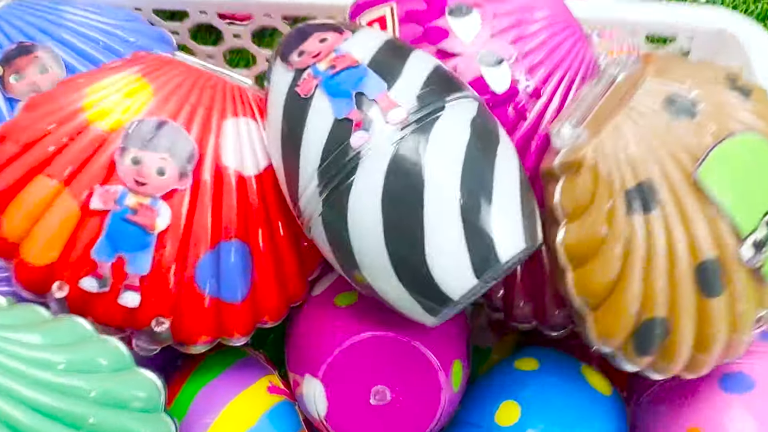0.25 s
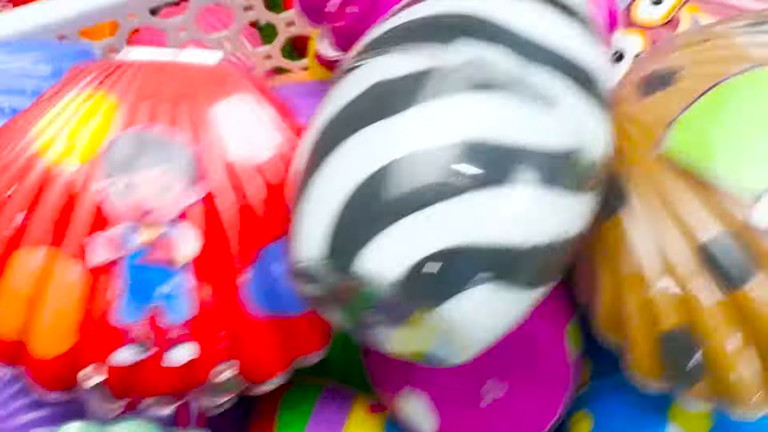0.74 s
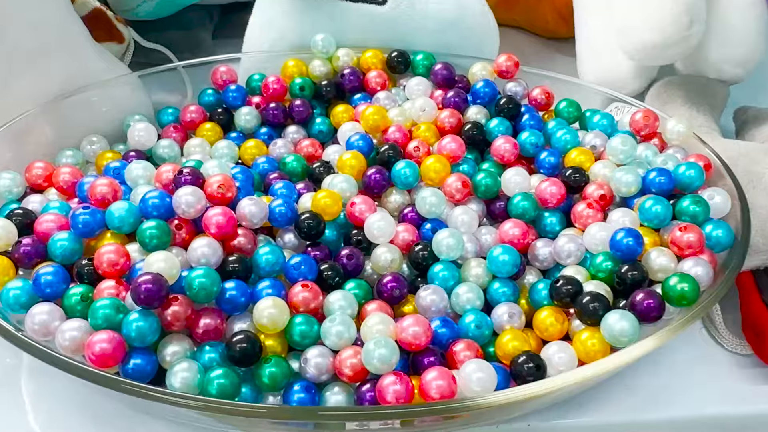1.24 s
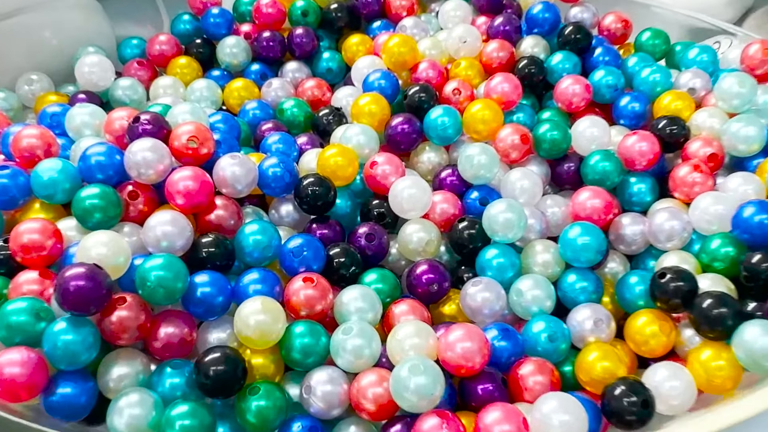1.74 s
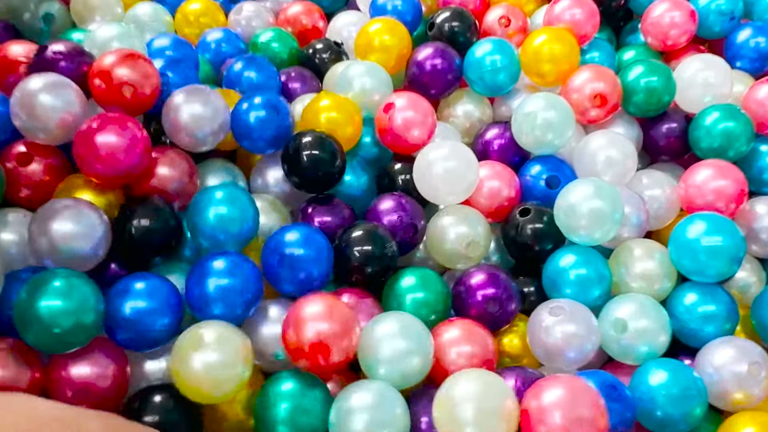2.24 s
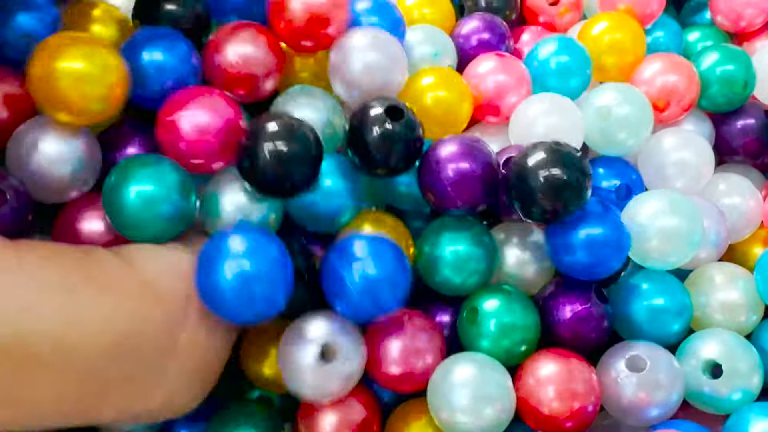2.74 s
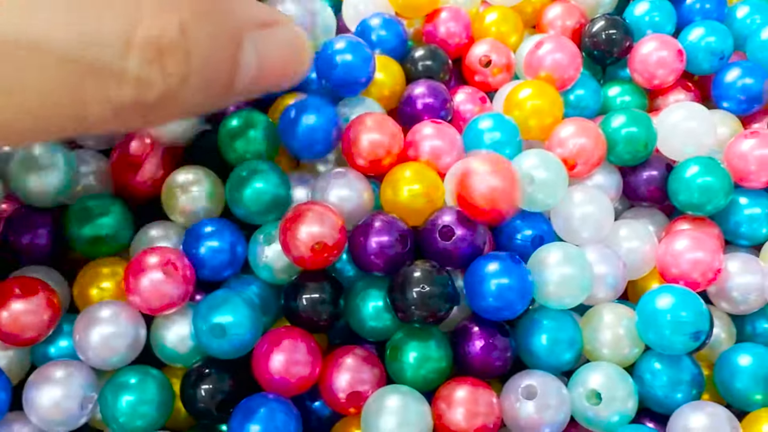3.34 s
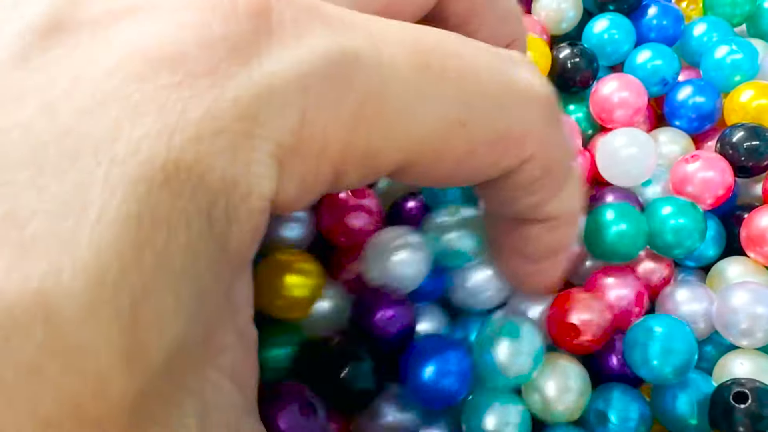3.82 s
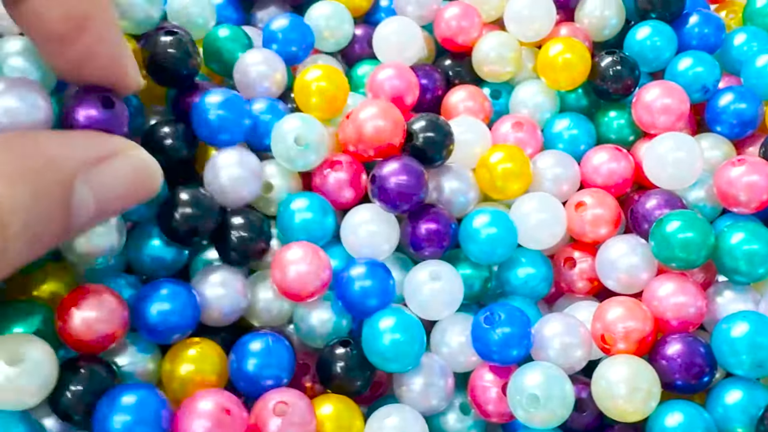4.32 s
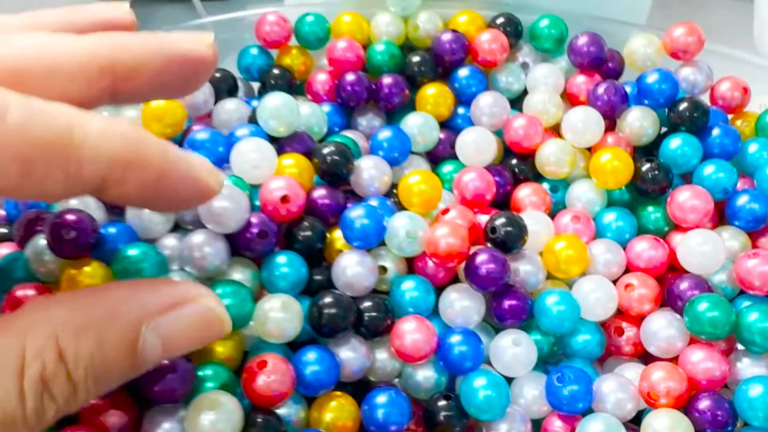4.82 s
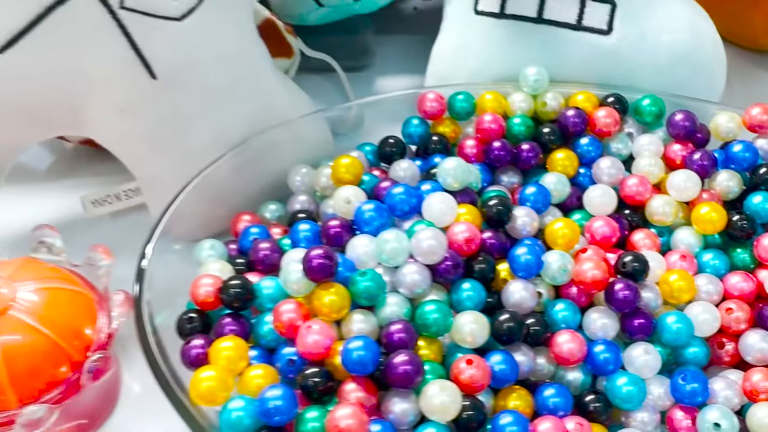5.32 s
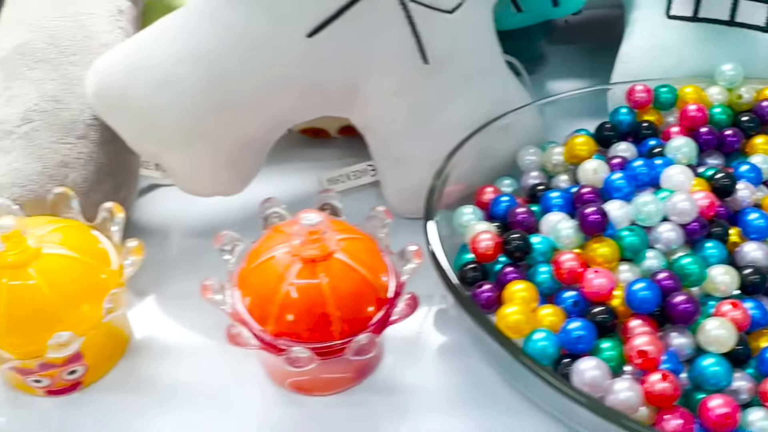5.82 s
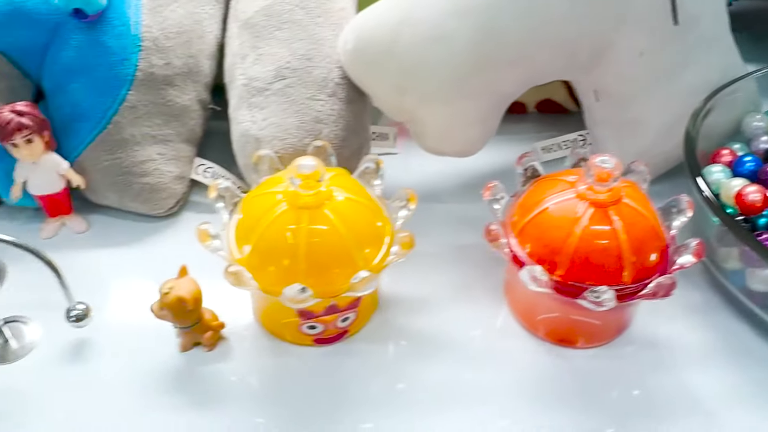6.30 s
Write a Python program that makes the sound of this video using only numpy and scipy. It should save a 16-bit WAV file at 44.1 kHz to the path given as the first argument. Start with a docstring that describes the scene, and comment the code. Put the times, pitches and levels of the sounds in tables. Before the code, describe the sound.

Close, dry stereo microphone in a very quiet room. At 0 s there is a faint hiss and a tiny rock of a hollow shell; from about 0.13 s hard plastic toys tumble together, hollow boxy knocks with sharp edge ticks, growing dense and loud from 0.5 s, loudest around 0.8 s. At 1.27 s the clatter is cut dead, leaving one faint shell rocking until about 1.36 s. Near silence until 2.0 s. Then a hand stirs hard beads in a glass bowl: soft low bumps at the start, then a dense, bright, hissing rattle of short clacks with slight glassy ring, its low end opening and closing. It continues to about 4.4 s, thins into separate clacks, one strong at 4.58 s, the last clear ones near 4.9 s. A soft swish at 5.0 s, faint hiss around 5.6 s, dull low handling bumps and very quiet air last until about 6.5 s.

```python
"""Close to a stereo microphone, hollow plastic toys tumble together and are cut off; one shell rocks faintly.
After a near silence a hand stirs hard beads in a glass bowl: dense clacks, thinning to single hits.
Hits are clicks and noise cracks; knocks and clacks also strike decaying modes of shell or glass.
The low end of the bead rattle opens and closes.
Soft low bumps of handling, shaped hiss and very quiet air lie underneath."""
import sys
import numpy as np
from scipy import signal
from scipy.fft import rfft, irfft, next_fast_len
from scipy.io import wavfile
from scipy.ndimage import uniform_filter1d, minimum_filter1d

SR = 44100
rng = np.random.default_rng(int(sys.argv[2]) if len(sys.argv) > 2 else 0)


def voltage_ratio(level):
    """Linear amplitude factor for a level in decibels (scalar or array-like)."""
    return 10 ** (np.asarray(level, float) / 20)


def transcribe(signal):
    """Save signal, clipped to [-1, 1], as a 16-bit WAV file at the path in sys.argv[1]."""
    frames = np.atleast_2d(signal).T
    limited = np.clip(frames, -1, 1)
    pcm = np.round(limited * 32767).astype(np.int16)
    wavfile.write(sys.argv[1], SR, pcm)


N = 289296
TIME = np.arange(N) / SR


def on_log(table, hz):
    """Read a (f/Hz, value) table on a log-frequency axis."""
    f_hz, value = np.array(table).T
    return np.interp(np.log(hz), np.log(f_hz), value)


def band(x, lo_hz, hi_hz, order=3):
    """Butterworth band-pass."""
    sos = signal.butter(order, [lo_hz, min(hi_hz, .45 * SR)], "band", fs=SR, output="sos")
    return signal.sosfilt(sos, x)


# likeness of the two microphone ports: f/Hz, correlation [0-1]
PORT_LIKENESS = [(100, .97), (300, .88), (700, .76), (1400, .48), (2200, .66), (5000, .42), (7100, .65),
                 (9100, .96), (12000, .97), (15500, .75)]


def pair(a, b, hz):
    """Left and right from two unrelated draws, as alike as the ports are at this frequency."""
    alike = on_log(PORT_LIKENESS, hz)
    return np.array([a, alike * a + np.sqrt(1 - alike ** 2) * b])


def pole(t60_s):
    """Gain per sample of a 60 dB fall in t60_s."""
    return np.exp(-np.log(1000) / (t60_s * SR))


def noise(lo_hz, hi_hz):
    """Stereo band noise of rms 1."""
    x = band(pair(*rng.standard_normal((2, N)), lo_hz), lo_hz, hi_hz, order=4)
    return x / x.std()


def bell(t_s, mid_s, length_s):
    """Gaussian swell, length_s wide between its 1/e points."""
    return np.exp(-(2 * (t_s - mid_s) / length_s) ** 2)


# air spectrum, relative: f/Hz, density/dB per Hz
AIR_SPECTRUM = [(18, -26.5), (30, -13.5), (56, -7), (415, -21), (1630, -25), (2830, -41.5), (6500, -39),
                (8000, -51), (16000, -65.5)]


def room():
    """Very quiet air: shaped stereo noise."""
    size = next_fast_len(N)
    hz = np.arange(1, size // 2 + 2) * SR / size
    spectra = pair(*rfft(rng.standard_normal((2, size))), hz)
    air = irfft(spectra * voltage_ratio(on_log(AIR_SPECTRUM, hz)), size)[:, :N]
    return voltage_ratio(-73.5) * air / air.std()


# faint swishes: peak t/s, level/dB, rise/s, fall/s (20 dB each), treble re level/dB
SWISHES = [(0, -39.5, .01, 0.6, -5.5), (.14, -28, 0.034, 0.059, -9), (1.316, -36.5, .012, 0.056, -47),
           (5.02, -33.5, 0.067, 0.15, -25), (5.62, -48, 0.22, 0.13, -13)]


def hiss():
    """Noise bands: broad swishes that swell and fade, and a thin hiss that stays a while."""
    low = high = 0
    for s, db, rise_s, fall_s, treble_db in SWISHES:
        swell = voltage_ratio(db - 20 * np.maximum((s - TIME) / rise_s, (TIME - s) / fall_s))
        low = low + swell
        high = high + swell * voltage_ratio(treble_db)
    thin_start_s, thin_end_s = 5.42, 5.76
    outside = np.maximum((thin_start_s - TIME) / .55, (TIME - thin_end_s) / .037)  # s per 20 dB
    thin = voltage_ratio(-20 * np.maximum(0, outside))
    return (thin * voltage_ratio(-54) * noise(3000, 3850) + low * noise(2350, 7000)
            + (high + thin * voltage_ratio(-55)) * noise(7900, 11500))


# soft bumps of the grip on the microphone: peak t/s, level/dB, f/Hz, length/s
GRIP_BUMPS = [(0.394, -51, 70.5, .1), (0.614, -33, 70, 0.058), (0.881, -42.5, 75, 0.06),
              (1.106, -55.5, 60, 0.068), (2.09, -26, 67.8, 0.033), (2.118, -18.5, 121, 0.016),
              (2.139, -25.5, 70.8, 0.022), (2.166, -40, 243, 0.02), (2.168, -30, 85, 0.046),
              (2.205, -24, 128.6, 0.026), (2.233, -33.5, 85, 0.058), (2.289, -33, 70.8, 0.035),
              (2.34, -30.5, 130, 0.022), (2.389, -45.5, 84, 0.048), (2.498, -43, 310, 0.038),
              (2.593, -50.5, 401, 0.14), (2.522, -34, 90.6, 0.033), (2.592, -35, 63.2, 0.05),
              (2.722, -51.5, 75.8, 0.045), (3.417, -59.5, 132, .06), (3.724, -41, 58, 0.057),
              (3.74, -58, 238, 0.055), (4.263, -59.5, 55.4, 0.06), (4.744, -42.5, 45, 0.1),
              (4.766, -40, 98.5, 0.07), (4.823, -59.5, 230, 0.067), (4.897, -57.5, 94.8, 0.043),
              (5.144, -35, 103.3, 0.074), (5.187, -58, 54.6, 0.05), (5.212, -36.5, 97.7, 0.033),
              (5.341, -43.5, 97.2, 0.047), (5.352, -51, 50.3, 0.22), (5.406, -61.5, 240, 0.051),
              (5.477, -47.5, 59.7, 0.12), (5.48, -41, 94.6, 0.074), (5.626, -33.5, 98.5, 0.1),
              (5.628, -46, 51.4, 0.088), (5.732, -43.5, 95.4, 0.075), (5.732, -46.5, 52.1, 0.16),
              (5.906, -37.5, 50.05, 0.097), (5.917, -46, 99.8, 0.074), (6.036, -54.5, 98.3, 0.11),
              (6.15, -48, 99.3, 0.13), (6.157, -47.5, 50, .07), (6.248, -50, 48.1, 0.081),
              (6.37, -57, 55.5, 0.054), (6.498, -59, 48.1, 0.11)]


def handling():
    """Each bump is a few soft sine cycles with a little low rubbing noise."""
    tone, rub = np.zeros(N), np.zeros(N)
    for (s, db, hz, length_s), turn in zip(GRIP_BUMPS, rng.random((len(GRIP_BUMPS), 1))):
        at = slice(max(int((s - 2 * length_s) * SR), 0), int((s + 2 * length_s) * SR))
        swell = voltage_ratio(db) * bell(TIME[at], s, length_s)
        tone[at] += swell * np.sin(2 * np.pi * (hz * TIME[at] + turn))
        rub[at] += swell
    return tone + voltage_ratio(-12) * rub * noise(36, 115)


# small rocks of one shell: onset t/s, level/dB, f/Hz
SHELL_ROCKS = [(.008, -38.5, 935), (1.311, -29, 1078), (1.333, -35.5, 1050), (1.359, -51, 1006)]


def rock():
    """One shell rocks lightly: short sine hums near 1 kHz, peaking 6.2 ms after onset."""
    hum = np.zeros(N)
    for s, db, hz in SHELL_ROCKS:
        t = np.clip(TIME - s, 0, None) / 0.0062
        hum += voltage_ratio(db) * (t * np.exp(1 - t)) ** 2 * np.sin(2 * np.pi * hz * TIME)
    return hum


def swarm(table, count, spread_db, each_db, pan_db):
    """Random small hits under a level curve, a few much stronger than the rest."""
    t_s, curve_db = np.array(table).T
    when, size, side = rng.random((count, 3)).T
    when = t_s[0] + (t_s[-1] - t_s[0]) * when
    level_db = np.interp(when, t_s, curve_db) + each_db - spread_db * np.log(np.maximum(size, .04))
    return when, level_db, pan_db + 8 * (side - .5)


def clatter(s, peak_db, pan_db, colour_db, crack, modes, crack_t60, rise_t60, scatter_db, click_db, drift_db,
            ring_db, tail_db, tail_t60, spread=0, loose=1):
    """Every hit is a click and a short crack of its own colour with a room tail, and strikes any modes anew."""
    start = int(s.min() * SR)
    at = (s * SR).astype(int) - start
    size = min(at.max() + SR // 3, N - start)
    side_db = peak_db + np.array([pan_db, -pan_db]) / 2
    rise = pole(rise_t60)

    def drift():
        """The heap shifts, so each band swells and sinks a few times a second."""
        knots_s = np.arange(s.min(), s.max() + 1, .2)
        return drift_db * np.interp(s, knots_s, rng.standard_normal(len(knots_s)))

    # each click reaches the two ports a few samples apart
    lag, sign = rng.random((len(s), 2)).T
    arrive = [at + 12, at + (24 * lag).astype(int)]

    # cracks in third-octave bands
    centres = 16290 / 2 ** np.arange(0, np.log2(16290 / crack[1][0]) + .1, 1 / 3)
    centres = centres[centres < 1.2 * crack[-2][0]]
    power = voltage_ratio(on_log(crack, centres)) ** 2 * centres
    edge = 2 ** (1 / 6)
    white, out = rng.standard_normal((2, size)), np.zeros((2, size))
    for hz, share in zip(centres, power / power.sum()):
        gain = voltage_ratio(side_db + colour_db(hz) + drift() + scatter_db * rng.standard_normal(len(s)))
        push = signal.lfilter([1 - rise], [1, -rise], [np.bincount(at, g ** 2, size) for g in gain])
        # lower cracks last longer; crack_t60 holds at 3 kHz
        fall = pole(crack_t60 * (3000 / hz) ** 0.065)
        envelope = signal.lfilter([1], [1, -fall ** 2], push)
        envelope += voltage_ratio(tail_db) ** 2 * signal.lfilter([1], [1, -pole(tail_t60) ** 2], push)
        clicks = np.array([np.bincount(a, g * np.sign(sign - .5), size) for a, g in zip(arrive, gain)])
        burst = np.sqrt(envelope) * pair(*white, hz) + voltage_ratio(click_db) * clicks
        width = hz * (edge - 1 / edge) / (SR / 2)
        out += np.sqrt(share / width) * band(burst, hz / edge, hz * edge, order=4)

    # every mode comes in three slightly different tunings, and each hit finds one of them
    ring = np.zeros((2, size))
    pick = np.round(np.clip(.8 * loose * rng.standard_normal(len(s)), -1, 1))
    tuned = [(hz * (1 + spread * k), db, t60, k) for hz, db, t60 in modes for k in (-1, 0, 1)]
    for hz, db, t60, k in tuned:
        a, b, c, d = rng.standard_normal((len(s), 4)).T
        phasor = pair(a + 1j * b, c + 1j * d, hz) / np.hypot(a, b) ** .5
        gain = voltage_ratio(side_db + colour_db(hz) + 2 * drift() + db + ring_db) * phasor * (pick == k)
        blows = [np.bincount(at, g.real, size) + 1j * np.bincount(at, g.imag, size) for g in gain]
        # the contact lasts a moment, so the ring swells before it dies
        turn = np.exp(2j * np.pi * hz / SR)
        ring += signal.lfilter([1 - rise], np.poly([rise * turn, pole(t60) * turn]), blows).imag
    if len(modes):
        # nothing radiates below the lowest mode
        out += band(ring, .7 * modes[0][0], 16000, order=4)
    return np.pad(out, ((0, 0), (start, N - start - size)))


# loudest hollow knocks: t/s, level/dB, boom under 600 Hz/dB, left minus right/dB
LOUD_KNOCKS = [(0.131, -22, -15.5, 0.5), (0.141, -16, -14, 9), (0.204, -14.5, 1, -1.5),
               (0.211, -11, -8.5, 10.5), (0.227, -6, 0, -7), (0.279, -10.5, -1.5, 4.5),
               (0.318, -6, 2, -1.5), (0.342, -9, -2, -2.5), (0.356, -5, -1.5, 2), (0.372, -11, 3, -2),
               (0.405, -6, 3.5, -5.5), (0.428, -7, 0, -0.5), (0.4491, -8, -2.5, -2.5),
               (0.502, -11.5, -3, 8.5), (0.5068, -4.5, -5, -4), (0.545, -8, -2, 5),
               (0.563, -8.5, -2.5, -0.5), (0.5733, -4, -4.5, 0.5), (0.602, -4, -6, 6), (0.6097, -9, -6, -6),
               (0.638, -11.5, -6, -4.5), (0.65, -3.5, 5, 3), (0.664, -8.5, 6, 0.5), (0.688, -5, -2.5, 7.5),
               (0.709, -6, -6.5, 18.5), (0.7204, -3, -3.5, 0.5), (0.729, -5.5, -5, 4.5),
               (0.743, -3, 0, 1.5), (0.77, -10.5, -4.5, 2), (0.778, -6.5, 0.5, 7), (0.8018, -12, -3.5, 2),
               (0.825, 0.5, -3, 2.5), (0.836, -4, 1.5, 2.5), (0.849, -6, 7.5, 2), (0.869, -9.5, -2, 4),
               (0.926, -7, -13, 5.5), (0.954, -4, 3.5, 5.5), (0.978, -11, -2, 4.5),
               (1.002, -11.5, -1.5, 2.5), (1.0236, -7.5, 0.5, 4.5), (1.036, -9, -8, -6.5),
               (1.05, -5.5, 0, -1), (1.094, -3.5, 0, 4.5), (1.1268, -4.5, 0, 5.5), (1.14, -1, -3, -5),
               (1.164, -7, -5, 3.5), (1.2123, -8, -2.5, 2.5), (1.256, -11, 0.5, 0)]
# loudest ticks of hard edges: t/s, level/dB, left minus right/dB
LOUD_TICKS = [(0.1431, -14.0, 1.5), (0.2029, -15.0, 3.0), (0.2293, -9.5, 2.0), (0.2886, -20.0, 2.5),
              (0.3007, -15.5, -0.5), (0.3186, -18.0, 1.0), (0.3461, -12.0, 0.0), (0.3754, -9.0, 1.0),
              (0.3868, -11.5, 1.5), (0.4056, -16.5, -0.5), (0.4496, -7.5, 1.5), (0.4999, -14.5, 5.0),
              (0.5076, -13.5, -0.5), (0.5445, -11.0, 0.0), (0.5622, -9.5, 2.5), (0.5726, -12.0, 2.5),
              (0.6088, -13.0, 0.5), (0.6312, -7.0, 1.5), (0.6393, -12.5, 1.0), (0.6498, -10.5, -0.5),
              (0.6885, -18.5, 3.0), (0.7295, -10.0, 0.5), (0.7442, -16.5, 2.0), (0.7637, -19.5, 1.0),
              (0.8021, -11.0, 0.5), (0.8289, -18.0, -1.5), (0.8361, -18.0, 2.0), (0.8415, -15.5, 1.5),
              (0.8486, -17.0, 3.0), (0.8575, -14.5, 3.5), (0.8693, -18.5, 1.5), (0.878, -16.0, -1.5),
              (0.912, -19.5, 3.0), (0.928, -15.0, 4.0), (0.9485, -16.5, 0.5), (0.9695, -13.5, 1.5),
              (0.9741, -12.0, 3.5), (0.9875, -10.0, 1.5), (1.0045, -11.5, 3.5), (1.0219, -12.0, 0.5),
              (1.037, -9.5, 5.0), (1.0784, -10.5, 2.0), (1.0926, -14.5, 4.5), (1.1213, -18.0, 3.5),
              (1.1247, -14.5, 4.0), (1.1378, -16.5, 1.0), (1.1581, -17.5, 0.0), (1.1645, -16.0, 1.5),
              (1.1749, -16.5, 1.5), (1.1841, -16.0, -1.0), (1.2135, -12.0, 2.5), (1.2561, -8.5, 3.5)]
# vigour of the tumble: t/s, level/dB
TUMBLE_VIGOUR = [(0, -46), (.07, -61.5), (.12, -28.5), (.19, -28.5), (.26, -35.5), (.4, -24.5), (.53, -19),
                 (.67, -17.5), (.86, -19), (1.05, -17.5), (1.12, -22), (1.2, -17.5), (1.27, -30.5)]
# crack spectra, relative: f/Hz, density/dB per Hz
KNOCK_SPECTRUM = [(35, -55), (60, -37), (135, -26), (221, 1.5), (305, -9), (948, 1), (1260, -4), (1640, -3),
                  (5500, -22), (7150, -48), (12100, -120)]
TICK_SPECTRUM = [(1800, -23.5), (2600, 1), (3500, -6), (5700, -4), (7100, 0.5), (9000, 1.5), (11300, -1.5),
                 (14200, -19), (16300, -12)]
# hollow shell modes: f/Hz, level/dB, t60/s
SHELL_MODES = [(227.2, -0.5, 0.088), (372, -7, 0.078), (536, 2.5, 0.029), (650, -4, 0.013),
               (820, -13, 0.035), (954, 4.5, 0.045), (1060, 2, 0.025), (1335, -11.5, 0.013),
               (1610, -12.5, 0.033), (1880, -13.5, .02), (2040, -9, 0.031), (2508, -3, 0.04)]


def toys():
    """Hollow knocks that ring the shells and bright ticks of hard edges. The sound is cut off abruptly."""
    s, db, boom_db, pan_db = np.transpose(LOUD_KNOCKS)
    small = swarm(TUMBLE_VIGOUR, count=1100, spread_db=3, each_db=-6.5, pan_db=-2.5)
    # small knocks lose their boom where the vigour is under -30.5 dB
    vigour_db = np.interp(small[0], *np.transpose(TUMBLE_VIGOUR))
    boom_db = np.r_[boom_db, -2.5 + 2 * np.minimum(vigour_db + 30.5, 0)]
    # shells differ in size: mode pitch spread 4.5 %
    knocks = clatter(*np.c_[[s, db, pan_db], small], lambda hz: boom_db * (hz < 600),
                     KNOCK_SPECTRUM, SHELL_MODES, crack_t60=.012, rise_t60=.0018, scatter_db=1.5,
                     drift_db=1, spread=.045, click_db=15, ring_db=-11.5, tail_db=-14, tail_t60=.2)
    small = swarm(TUMBLE_VIGOUR, count=1300, spread_db=5, each_db=-17, pan_db=2.5)
    ticks = clatter(*np.c_[np.transpose(LOUD_TICKS), small], lambda hz: 0, TICK_SPECTRUM, [],
                    crack_t60=.006, rise_t60=.001, scatter_db=3, click_db=3, drift_db=1.5,
                    ring_db=0, tail_db=-28, tail_t60=.3)
    cut_s = 1.273
    cut_db = np.interp(TIME, [cut_s, cut_s + .00091, 1.296, 1.3], [-0.5, -55.5, -85, -53])
    return (knocks + ticks) * voltage_ratio(cut_db)


# stirring vigour: t/s, level/dB
STIR_VIGOUR = [(2.05, -27), (2.13, -29.5), (2.2, -15), (2.35, -21.5), (2.42, -24.5), (2.6, -15.5),
               (2.75, -23), (3.2, -25), (3.42, -24.5), (3.49, -30), (3.62, -28), (3.87, -18), (4.02, -22),
               (4.25, -17.5), (4.43, -25.5), (4.5, -31.5), (4.72, -33), (4.8, -43.5), (4.92, -29.5),
               (5.1, -59)]
BUSY_DB = -26  # stirring level under which the heap calms


def slide(s, db, *colour, count):
    """A loud clack in a moving heap drags neighbours along: weaker repeats scattered nearby."""
    when, size = rng.standard_normal((len(s), 2, count)).transpose(1, 0, 2)
    calm_db = 4 * np.minimum(np.interp(s, *np.transpose(STIR_VIGOUR)) - BUSY_DB, 0)
    near_s = s[:, None] + .004 + .009 * when  # mean delay, spread
    near_db = (db - 13 + calm_db)[:, None] + 2.1 * size
    repeated = [np.r_[c, np.repeat(c, count)] for c in colour]
    return [np.r_[s, near_s.ravel()], np.r_[db, near_db.ravel()]] + repeated


# loudest bead clacks: t/s, level/dB, treble/dB (full from 8 kHz), left minus right/dB
LOUD_CLACKS = [(2.023, -41.5, 11.0, 1.0), (2.0297, -11.0, -3.5, 6.0), (2.0491, -7.5, 5.0, 4.5),
               (2.0652, -19.0, -3.0, 6.0), (2.0759, -25.0, -6.0, 2.5), (2.1014, -6.5, 5.0, 5.0),
               (2.139, -11.0, 1.5, 3.0), (2.1518, -9.0, 6.0, 2.0), (2.1635, -9.0, 6.5, 3.0),
               (2.1817, -5.5, 2.0, 2.5), (2.21, -8.0, 1.5, 4.5), (2.215, -4.0, -5.5, 2.0),
               (2.2192, -6.0, -1.5, 2.5), (2.238, -9.5, -1.0, 2.5), (2.2666, -9.0, 7.5, 1.5),
               (2.2749, -5.5, -1.0, 0.5), (2.2921, -6.5, -4.5, -2.0), (2.3042, -7.0, 4.0, 2.0),
               (2.3433, -11.0, 10.5, 3.0), (2.3489, -7.5, 4.0, 1.0), (2.3678, -9.5, 7.5, 3.5),
               (2.4073, -13.0, 9.0, 2.5), (2.4265, -10.0, -0.5, 3.0), (2.4356, -12.0, 1.5, 1.5),
               (2.4482, -11.5, -0.5, 5.5), (2.4598, -10.5, 7.0, 0.0), (2.4994, -10.0, 8.5, 3.5),
               (2.5122, -8.5, 6.0, 1.5), (2.5405, -8.5, 7.5, 1.0), (2.5472, -5.0, 2.5, 1.0),
               (2.587, -12.0, -2.0, -1.0), (2.618, -6.5, 7.0, 1.0), (2.6285, -8.5, 9.5, 3.5),
               (2.6644, -9.0, 6.0, 5.5), (2.6789, -10.0, 13.0, 5.0), (2.686, -8.0, 9.5, 4.0),
               (2.7239, -7.5, 9.5, 3.5), (2.7451, -13.5, 5.0, 3.0), (2.7651, -10.5, 5.5, 1.0),
               (2.7821, -8.0, 4.5, 2.0), (2.7935, -9.0, 1.5, 2.5), (2.8128, -9.5, 7.5, 2.0),
               (2.8309, -6.5, 2.5, 4.5), (2.8417, -8.5, 4.0, 2.0), (2.8586, -8.0, 6.0, 3.5),
               (2.8659, -10.5, 10.0, 3.5), (2.882, -8.0, 6.5, 3.5), (2.8899, -8.0, 2.0, 5.0),
               (2.8941, -9.5, -1.0, 2.5), (2.9267, -8.0, 6.5, 1.0), (2.9419, -9.5, 14.0, 2.0),
               (2.9554, -10.5, 7.0, 3.0), (2.9701, -9.0, -0.5, 2.0), (2.976, -12.5, 10.0, 2.5),
               (2.9925, -8.5, -2.5, 1.0), (2.9986, -12.0, 8.0, 2.0), (3.0071, -7.0, -0.5, 3.0),
               (3.0288, -7.5, 5.0, 1.5), (3.0367, -10.5, 8.5, 2.5), (3.0441, -9.0, 1.5, 2.0),
               (3.0706, -11.5, 9.0, 3.0), (3.0748, -6.0, 2.0, 1.0), (3.0875, -11.0, 1.5, 4.5),
               (3.0968, -7.0, 0.0, 0.0), (3.1115, -8.5, -4.0, 3.0), (3.1219, -9.5, 9.0, 1.0),
               (3.1555, -7.0, 7.0, 1.5), (3.1672, -6.5, 0.5, -0.5), (3.1767, -6.5, 6.0, -1.5),
               (3.1901, -5.0, -2.5, 0.5), (3.1981, -11.0, 6.5, 4.0), (3.212, -11.0, 11.5, 4.5),
               (3.2224, -10.5, 10.5, 4.0), (3.2269, -8.0, -3.0, 2.5), (3.2361, -10.5, 4.5, 3.0),
               (3.247, -8.5, 2.5, 2.5), (3.2567, -10.0, 6.5, 0.0), (3.2642, -6.0, 1.5, 0.0),
               (3.2731, -6.0, -4.0, -1.0), (3.2864, -9.0, 2.5, 4.5), (3.3005, -6.5, 4.0, 1.5),
               (3.3137, -6.5, 0.0, 5.0), (3.3246, -8.5, 5.0, 5.0), (3.3429, -9.5, 4.5, 2.0),
               (3.3472, -11.0, 9.5, 3.0), (3.3896, -7.5, 8.0, 3.0), (3.4037, -5.5, 5.0, 0.0),
               (3.4293, -9.5, 1.0, -1.0), (3.4518, -10.5, 6.0, 2.0), (3.4606, -10.0, 12.0, 2.0),
               (3.5062, -10.5, 6.0, 1.5), (3.5135, -13.0, 11.5, 2.0), (3.5234, -10.5, 8.0, 3.0),
               (3.5413, -10.5, 4.0, 1.0), (3.5646, -8.0, -3.0, 4.0), (3.5965, -8.0, 14.0, 1.5),
               (3.638, -12.5, 5.0, 3.0), (3.6487, -9.0, -3.0, 3.5), (3.6606, -13.5, 4.0, -0.5),
               (3.6755, -9.5, -1.5, 0.5), (3.6825, -8.5, -3.0, 1.5), (3.7048, -9.0, 2.5, 2.0),
               (3.7151, -7.0, -4.5, 5.0), (3.7293, -9.0, 6.5, 7.5), (3.7539, -8.0, -7.0, 3.0),
               (3.7591, -6.5, 8.0, 0.0), (3.7733, -9.0, 11.5, 4.5), (3.7833, -8.5, -0.5, 1.5),
               (3.8245, -10.0, 11.5, 4.0), (3.8339, -11.5, 13.0, 5.5), (3.8417, -11.0, 10.0, 3.5),
               (3.8486, -9.0, 14.0, 3.0), (3.8736, -8.5, 14.0, 2.0), (3.9185, -10.5, 14.0, 3.0),
               (3.9412, -15.0, 12.5, 2.0), (3.9859, -9.0, 14.0, 3.0), (4.0445, -7.5, 10.5, 3.5),
               (4.0618, -8.0, 4.0, 4.0), (4.0736, -11.5, 8.0, 3.0), (4.0916, -6.5, 5.0, 2.0),
               (4.1155, -8.0, 7.0, 6.0), (4.1504, -10.5, 7.0, 2.5), (4.1583, -10.0, 4.0, 2.0),
               (4.189, -15.0, 8.5, 2.5), (4.1978, -10.0, 1.5, 0.0), (4.2308, -9.5, 12.0, 2.0),
               (4.2497, -7.0, 0.5, 3.5), (4.2682, -11.5, 11.0, 3.5), (4.2848, -7.0, 4.0, 3.0),
               (4.3183, -7.0, 0.0, 3.0), (4.3246, -10.0, 8.5, 2.0), (4.3326, -8.5, 0.5, 1.5),
               (4.3408, -9.0, -6.5, -1.0), (4.3499, -9.0, 6.5, 4.5), (4.3596, -8.5, 2.0, 3.5),
               (4.3805, -5.5, 6.0, 2.5), (4.4065, -4.5, -3.5, 3.5), (4.4465, -12.0, 8.5, 2.5),
               (4.467, -14.5, 0.5, 3.0), (4.4912, -14.0, 10.0, 3.0), (4.4977, -11.0, 6.0, 2.5),
               (4.5083, -10.0, 7.5, 7.0), (4.5392, -6.5, 1.0, -0.5), (4.5541, -13.5, 12.0, 2.5),
               (4.5785, -1.0, 1.5, 2.5), (4.5897, -10.0, 10.0, 4.5), (4.6241, -19.0, -6.5, 4.5),
               (4.6391, -11.0, 6.0, 4.5), (4.6494, -13.0, 1.0, 3.5), (4.6565, -14.0, -2.0, 3.0),
               (4.6644, -14.0, 4.5, 3.5), (4.6969, -21.0, -1.0, 4.5), (4.7139, -17.0, -3.5, 3.0),
               (4.7277, -12.0, -6.5, 1.5), (4.7469, -24.5, -8.0, 5.0), (4.8105, -22.0, 1.0, 0.0),
               (4.816, -8.5, 4.0, 4.5), (4.86, -9.5, -2.5, 0.5), (4.8761, -17.0, -8.0, 2.0),
               (4.8966, -7.0, 6.5, 4.0), (4.911, -11.0, 11.0, 1.5), (4.9314, -12.5, 5.5, 5.5),
               (4.9738, -26.0, 1.5, -2.0), (5.019, -39.0, 7.5, 5.5), (5.0776, -39.0, -1.0, -0.5)]
# crack spectrum, relative: f/Hz, density/dB per Hz
BEAD_SPECTRUM = [(150, -71), (250, -47.5), (400, -43), (510, -35.5), (640, -23.5), (810, -2), (1020, -3.5),
                 (1280, -12), (1620, 5), (2360, 16.5), (4050, 17.5), (5700, 12), (7100, 10.5), (9000, 10),
                 (11300, -4.5), (14200, -22.5), (16300, -17.5)]
# glass bowl modes: f/Hz, level/dB, t60/s
GLASS_MODES = [(1350, -3, .025), (2425, -5, .05), (3120, -1, .055), (4090, 0, .025), (5225, -7, .06),
               (5470, -11, .04), (6385, -10, .09), (7080, -5, .02), (7765, -11, .065), (8460, -5, .035),
               (8990, -1, .02), (9300, -1, .014), (10130, -7, .015), (10830, -14, .025)]
# the low end of the rattle opens and closes: mid t/s, length/s, lift/dB
LOW_END_SWELLS = [(2.108, 0.27, 3.5), (2.278, 0.86, 32), (2.62, 0.21, 28.5), (2.867, 0.2, 16.5),
                  (3.386, 0.087, 28), (3.721, 0.29, 31), (3.944, 0.18, 16), (4.39, 0.36, 17),
                  (4.728, 0.084, 24), (4.911, 0.11, 21)]
# how far each region follows the low end: f/Hz, share of lift
LOW_END_SHARE = [(400, 1.37), (510, 1.28), (640, 1.4), (810, 0.54), (1020, .62), (1280, 0.28), (2000, 0.24),
                 (2400, 0.0074)]
# one region of the rattle comes forward or recedes as the heap shifts: mid t/s, length/s, f/Hz, level/dB
REGION_SHIFTS = [(2.62, .25, 990, -2.5), (3.2, 0.34, 4000, 4), (3.76, 0.8, 1430, 5), (4.652, 0.1, 6240, 3)]


def beads():
    """Single clacks over a dense swarm ring the glass; the low end of the rattle opens and closes."""
    s, db, treble_db, pan_db = slide(*np.transpose(LOUD_CLACKS), count=6)
    small = swarm(STIR_VIGOUR, count=6000, spread_db=1.5, each_db=-8.5, pan_db=0)
    hits = np.c_[[s, db, pan_db], small]
    hit_s = hits[0]
    loud_count, small_count = len(s), len(small[0])

    def by_size(loud, little):
        """One value for the loud clacks, another for the small."""
        return np.r_[np.full(loud_count, loud), np.full(small_count, little)]

    swell_db = sum(lift_db * bell(hit_s, mid_s, length_s) for mid_s, length_s, lift_db in LOW_END_SWELLS)
    low_end_db = np.minimum(swell_db - 13, 22)  # -13: closed
    treble_db = np.r_[treble_db, np.full(small_count, 2.5)]
    # a still heap lets the glass ring freer
    still_db = np.clip(BUSY_DB - np.interp(hit_s, *np.transpose(STIR_VIGOUR)), 0, 10)
    # the small clacks are mostly bead on bead and reach the glass less
    ring_db = by_size(-13.5, -17.5) + .6 * still_db

    def colour_db(hz):
        """Gain of every hit at this frequency."""
        forward_db = sum(lift_db * bell(hit_s, mid_s, length_s) * np.exp(-(4 * np.log2(hz / mid_hz)) ** 2)
                         for mid_s, length_s, mid_hz, lift_db in REGION_SHIFTS)
        return (forward_db + low_end_db * on_log(LOW_END_SHARE, hz)
                + treble_db * np.clip(np.log2(hz / 4000), 0, 1))

    # the load of beads shifts the glass: mode pitch spread 1.4 %, found less often in a still heap
    return clatter(*hits, colour_db, BEAD_SPECTRUM, GLASS_MODES, crack_t60=.013, rise_t60=.0022,
                   scatter_db=by_size(2.5, 4.5), click_db=7, spread=.014, loose=voltage_ratio(-2 * still_db),
                   drift_db=1.3, ring_db=ring_db, tail_db=-30, tail_t60=.25)


def scene():
    """All sources at the microphone."""
    return toys() + rock() + beads() + handling() + hiss() + room()


def top_cut(x):
    """Nothing passes above the cut-off."""
    return signal.sosfilt(signal.butter(12, 16800, fs=SR, output="sos"), x)


# right port against left: f/Hz, level/dB
PORT_LEVEL = [(60, -1), (150, -2), (400, -0.5), (700, -6.5), (1300, -3.5), (2400, 0), (4400, -4.5),
              (8000, -2), (12000, 3)]
# right port against left: f/Hz, phase/rad
PORT_TURN = [(100, 0), (700, -.6), (1400, -2.2), (2200, -3), (7100, -2.2), (8100, -2.2), (9100, -1.4),
             (11000, -.2), (12100, 0), (13800, .6), (15500, 2.2)]


def record(dry):
    """Right port turns phase and colours; the top is cut; a look-ahead limiter holds peaks at full scale."""
    size = next_fast_len(N)
    hz = np.arange(1, size // 2 + 2) * SR / size
    port = voltage_ratio(on_log(PORT_LEVEL, hz)) * np.exp(1j * on_log(PORT_TURN, hz))
    right = irfft(rfft(dry[1], size) * port, size)[:N]
    low_pass = signal.ellip(8, .2, 60, 15900, fs=SR, output="sos")
    wet = signal.sosfilt(low_pass, np.array([dry[0], right]))
    need = 1 / np.maximum(np.abs(wet).max(axis=0), 1)
    gain = uniform_filter1d(minimum_filter1d(need, size=401), size=400)
    return top_cut(wet * gain)


dry = scene()
out = record(dry)
transcribe(out)
```